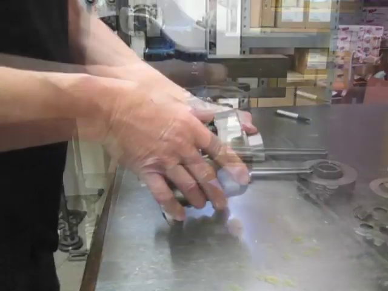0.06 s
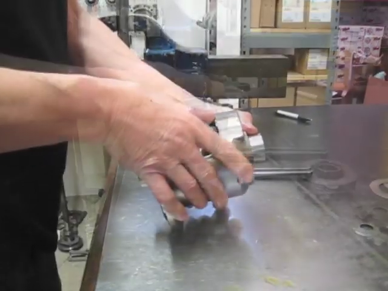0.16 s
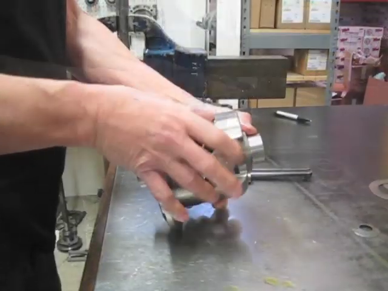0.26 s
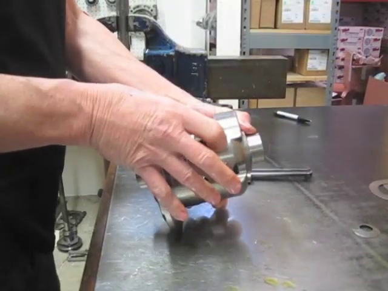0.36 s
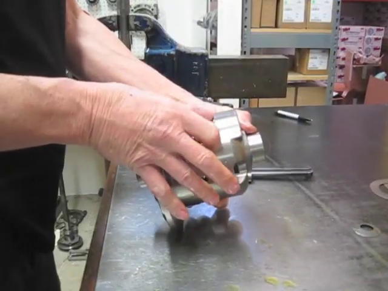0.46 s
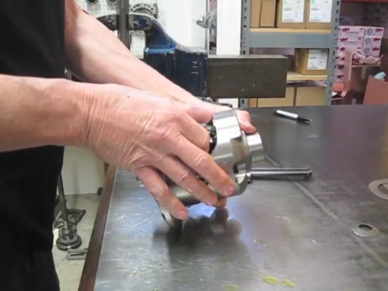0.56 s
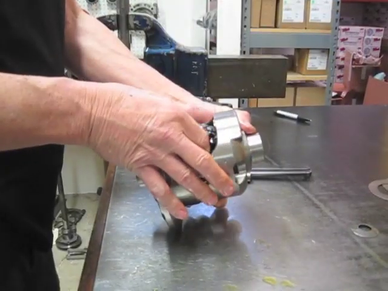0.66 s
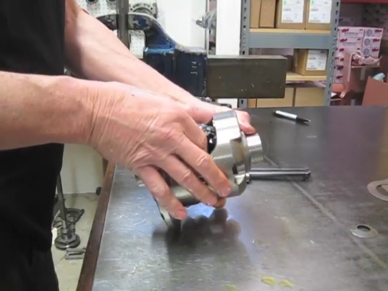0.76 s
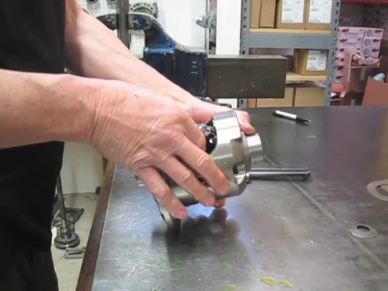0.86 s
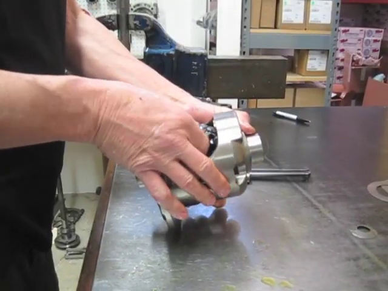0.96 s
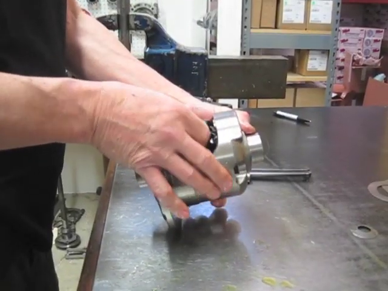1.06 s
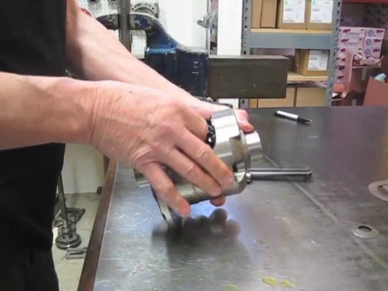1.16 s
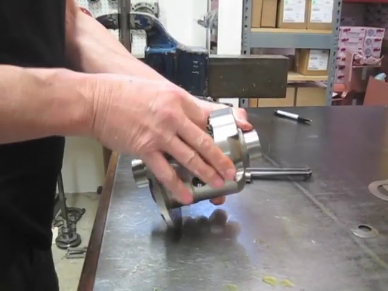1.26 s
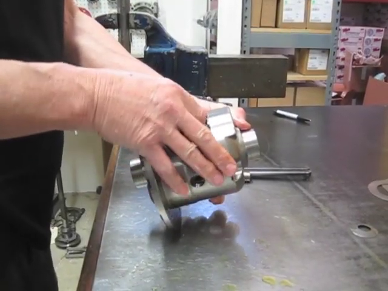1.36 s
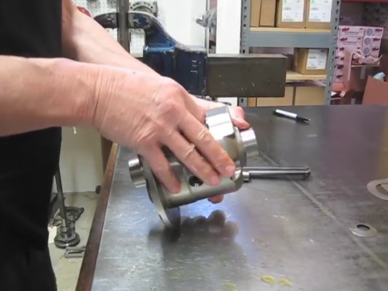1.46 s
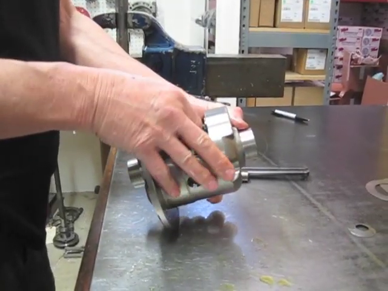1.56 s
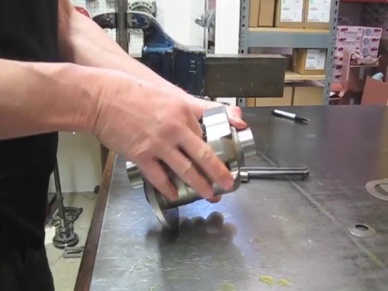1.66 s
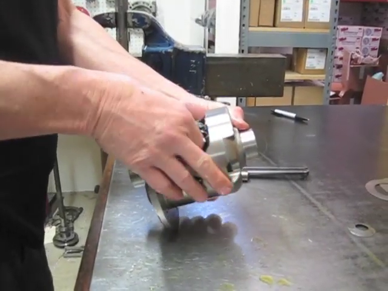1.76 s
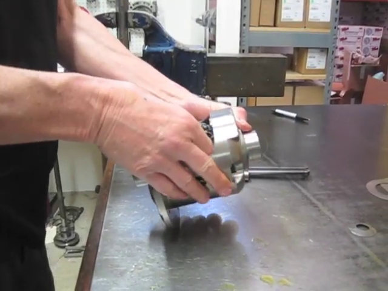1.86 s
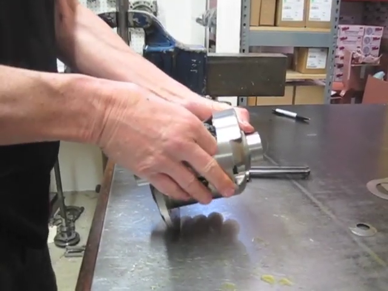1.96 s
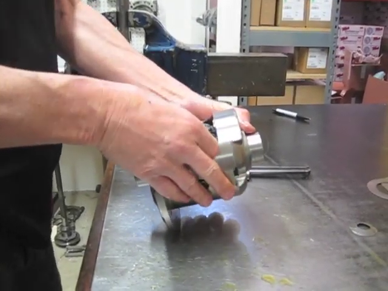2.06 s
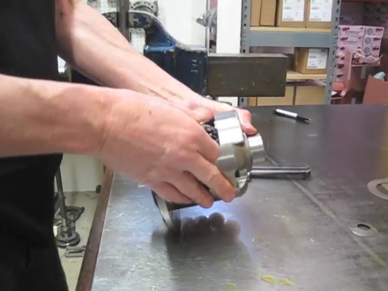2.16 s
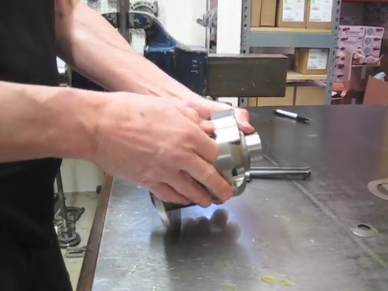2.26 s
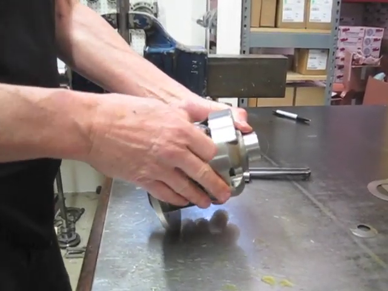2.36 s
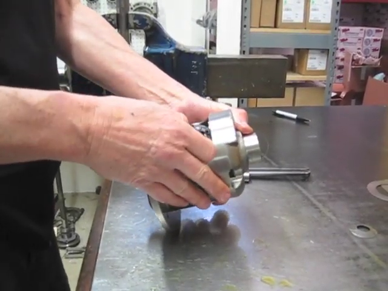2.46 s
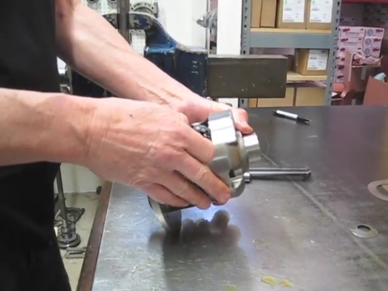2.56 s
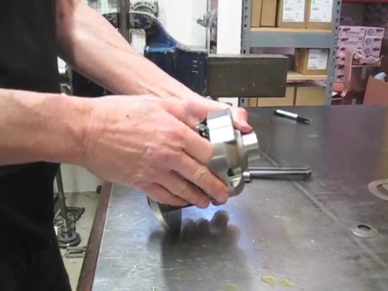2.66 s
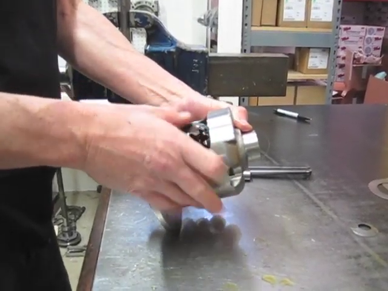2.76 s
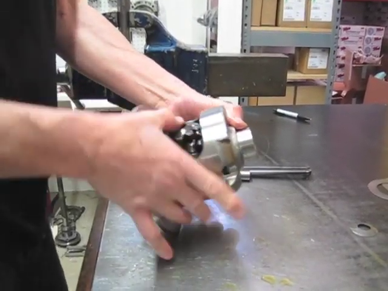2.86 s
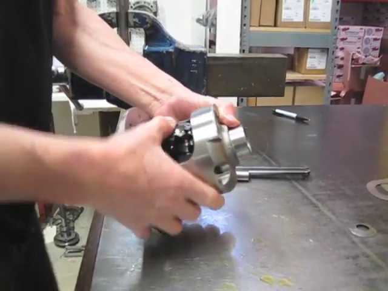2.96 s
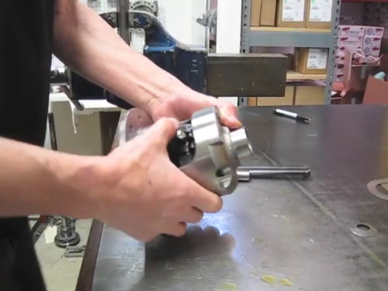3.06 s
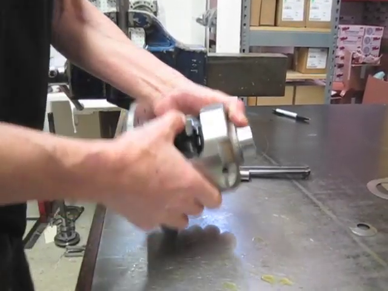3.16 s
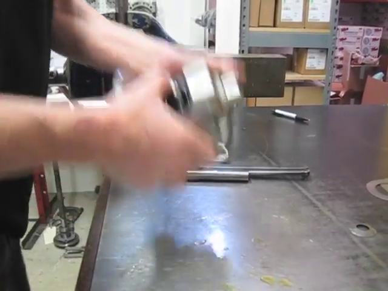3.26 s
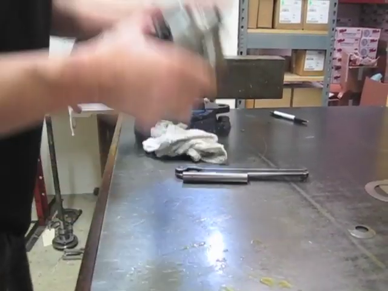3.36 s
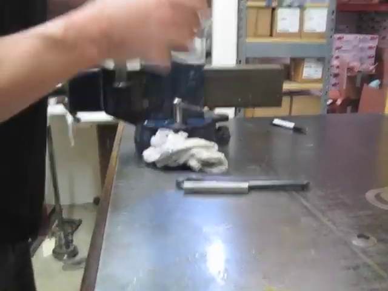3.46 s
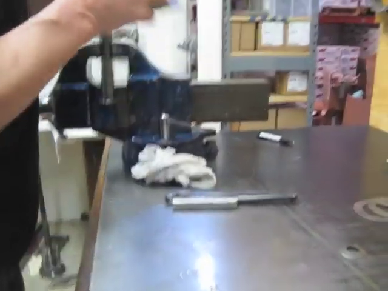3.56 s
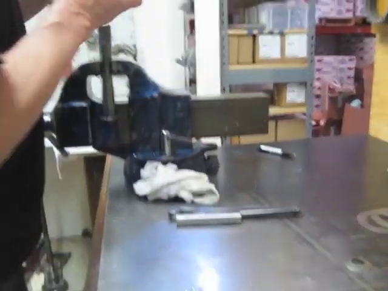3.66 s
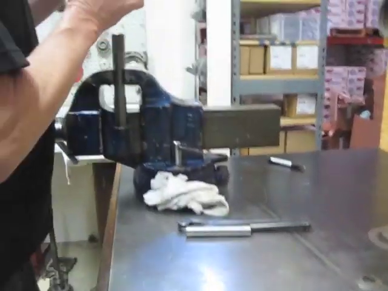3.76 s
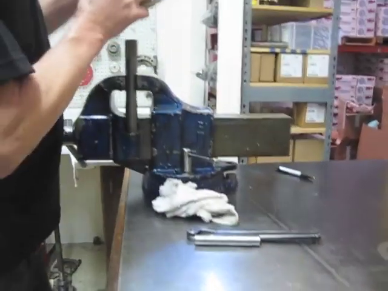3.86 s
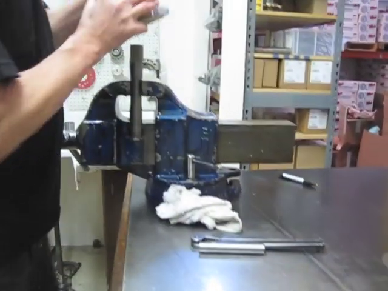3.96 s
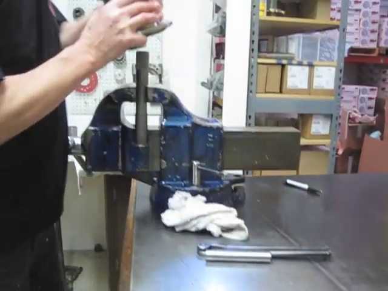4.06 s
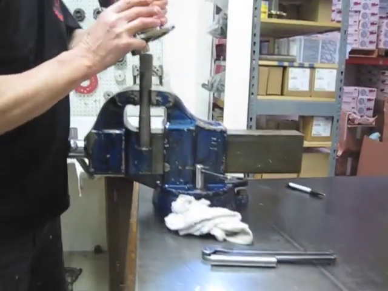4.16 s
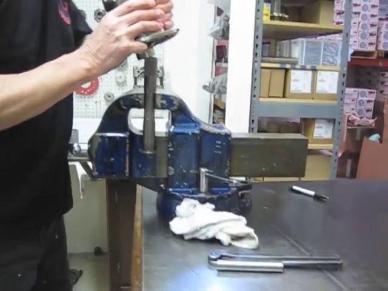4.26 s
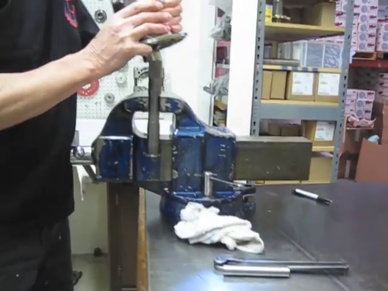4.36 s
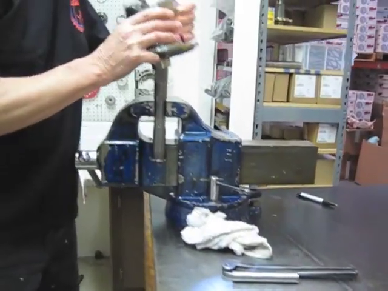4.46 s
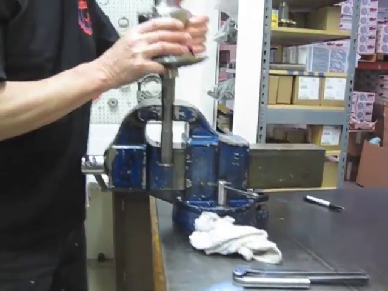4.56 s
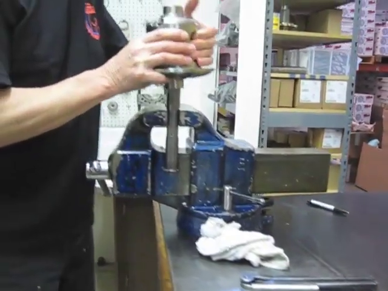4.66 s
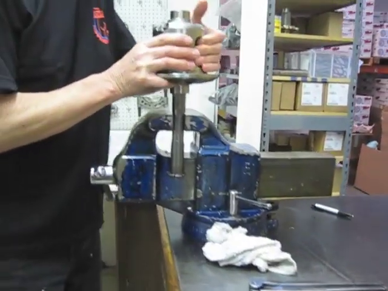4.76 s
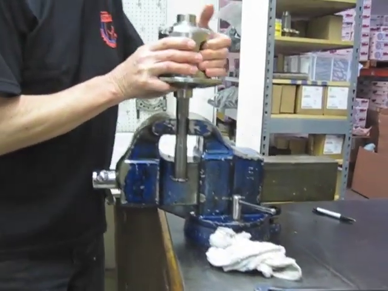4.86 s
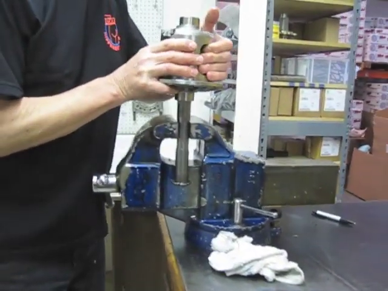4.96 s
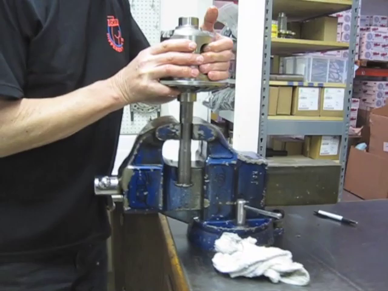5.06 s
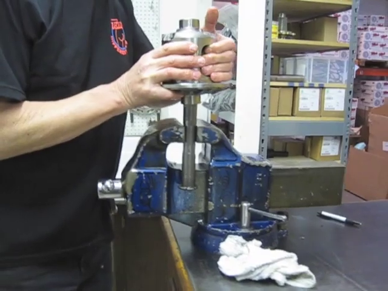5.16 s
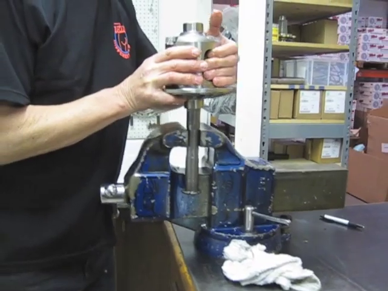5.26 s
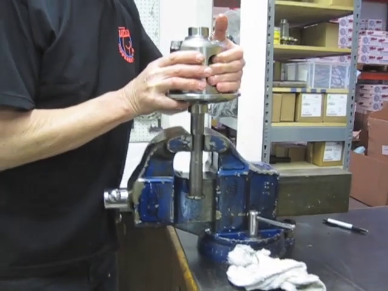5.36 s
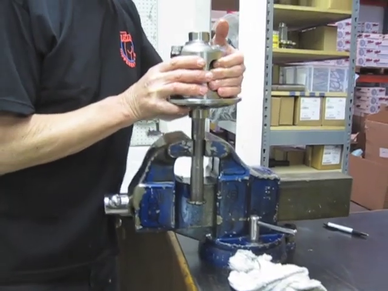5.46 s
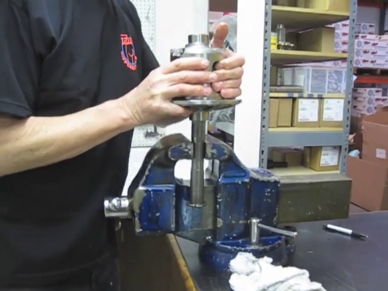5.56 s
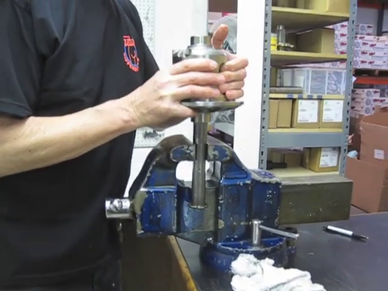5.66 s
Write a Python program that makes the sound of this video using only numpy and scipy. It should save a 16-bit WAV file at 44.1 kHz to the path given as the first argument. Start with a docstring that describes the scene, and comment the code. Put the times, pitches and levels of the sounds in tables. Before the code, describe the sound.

Quiet workshop hum, small metallic rattles and tinks, a pause with soft brushing, then loud steel clunks, a scraping groan and fading soft thuds.

```python
"""Quiet workshop air and lamp hum run throughout, as filtered noise and sines; dry ticks are treble noise bursts.
A mechanic turns a steel gear housing in his hands: its loose gears tink, shiver and clack, ringing its modes.
Brushing slides of skin and cloth are shaped hiss. He lowers the housing onto a shaft held in a bench vice,
which grinds (grains driving modes), clunks and thuds (struck modes) and groans (gliding resonances).
Hard walls answer with band-wise decaying echoes."""
import sys
import numpy as np
from scipy import signal
from scipy.fft import rfft, irfft
from scipy.io import wavfile
from scipy.ndimage import uniform_filter1d

SR = 44100
rng = np.random.default_rng(int(sys.argv[2]) if len(sys.argv) > 2 else 0)


def attenuation_scalar(level_db):
    """Turn a level in dB into a linear amplitude multiplier (20 dB per decade)."""
    decades = np.asarray(level_db, float) / 20
    return 10 ** decades


def materialize(psi):
    """Save the field psi as 16-bit PCM at rate SR to the path in sys.argv[1].

    A 1-D psi becomes a single channel; in a 2-D psi each row is a channel.
    """
    bounded = np.clip(np.atleast_2d(psi).T, -1, 1)
    quanta = np.round(bounded * 32767).astype(np.int16)
    wavfile.write(sys.argv[1], SR, quanta)


N = 251370


def read(points, hz):
    """Spectral interpolation: reads a table on a logarithmic frequency axis."""
    f, value = np.transpose(points)
    return np.interp(np.log(hz + 1), np.log(f + 1), value)


def evened(x):
    """Power normalisation: scales to rms 1."""
    return x / np.sqrt(np.mean(x ** 2) + 1e-20)


def curve(tables):
    """Level envelope: joins (t/s, level/dB) points by straight lines, at -120 dB elsewhere."""
    out = np.full(N, -120.)
    for rows in tables:
        s, value = np.transpose(rows)
        at = np.arange(round(s[0] * SR), min(round(s[-1] * SR), N))
        out[at] = np.interp(at / SR, s, value)
    return out


def stroke(start, rise, fade, db):
    """Amplitude envelope: a parabolic swell and fade in dB, silent outside."""
    edge_db = -25  # level at both ends, relative to the peak
    u = np.arange(N) / SR - start - rise
    u = np.where(u < 0, u / rise, u / fade)
    return attenuation_scalar(db + edge_db * u ** 2) * (abs(u) < 1)


def noise(spectrum, patchy_db):
    """Filtered noise: random short-time spectra with drifting patches, rms 1."""
    a, b, patches = rng.standard_normal((N // 256 + 5, 513, 3)).T
    patches = uniform_filter1d(patches, size=12, axis=0)
    patches = evened(uniform_filter1d(patches, size=12, axis=1))
    shape_db = read(spectrum, np.fft.rfftfreq(1024, 1 / SR))[:, None]
    z = (a + 1j * b) * attenuation_scalar(shape_db + patchy_db * patches)
    return evened(signal.istft(z, nperseg=1024, noverlap=768)[1][:N])


def grains(per_s, spread_db, soft_hz):
    """Shot noise: dense low-passed clicks of random sign, a few of them large, rms 1."""
    size = attenuation_scalar(spread_db * np.minimum(rng.exponential(1, N), 3)) * rng.choice([-1., 1.], N)
    clicks = size * (rng.random(N) < per_s / SR)
    return evened(signal.sosfilt(signal.butter(2, soft_hz, fs=SR, output="sos"), clicks))


def ring(drive, hz, t60):
    """Damped resonator: a unit click excites one mode that falls 60 dB in t60 (at least 5 ms)."""
    r, w = np.exp(-np.log(1000) / (max(t60, .005) * SR)), 2 * np.pi * hz / SR
    return signal.lfilter([0, np.sin(w)], [1, -2 * r * np.cos(w), r * r], drive)


def rubbed(modes, drive, damping):
    """Driven resonance: chatter sustains the modes, damped harder while the parts stay in touch."""
    out = np.zeros(N)
    for hz, db, t60 in modes:
        short_t60 = damping * t60
        out += attenuation_scalar(db) * ring(drive(hz) / np.sqrt(short_t60 * SR), hz, short_t60)
    return out


def struck(modes, crowd, s, colour_db, grip, luck_db, shift, contact_s, bounce_s, bounce_db, size):
    """Modal superposition: each blow shifts and weights the modes and adds a crowd of weak ones."""
    out, t = np.zeros(N + size), np.arange(size) / SR
    hz, db, t60 = np.transpose(modes)[:, :, None]
    bands = [signal.butter(3, [lo, hi], "bandpass", fs=SR, output="sos") for lo, hi, *_ in crowd]
    luck = rng.standard_normal((len(s), 3, len(modes), 1))
    hiss = rng.standard_normal((len(s), len(crowd), size))
    bounces = rng.random((len(s), 4))
    hold = 1 - grip * rng.random(len(s))  # the hands damp each blow differently
    mode_db = np.array([colour_db(f) for f in hz[:, 0]]).T[:, :, None]
    crowd_db = np.array([colour_db(np.sqrt(lo * hi)) + level for lo, hi, level, _ in crowd]).T
    for k, start in enumerate(s):
        fall = -60 * t / hold[k]
        cycles = hz * (1 + shift * luck[k, 0]) * t
        level_db = db + mode_db[k] + luck_db * luck[k, 1] + fall / t60
        rings = attenuation_scalar(level_db) * np.sign(luck[k, 2]) * np.sin(2 * np.pi * cycles)
        sound = (rings * (1 - np.exp(-t * hz / 0.49))).sum(0)  # low modes take longer to build up
        for band, level, white, (low_hz, _, _, crowd_t60) in zip(bands, crowd_db[k], hiss[k], crowd):
            weak = evened(signal.sosfilt(band, white)) * (1 - np.exp(-t * low_hz / 0.51))
            sound += attenuation_scalar(level + fall / crowd_t60) * weak
        taps = signal.unit_impulse(size)  # the loose part rebounds, later rebounds being weaker
        taps[(bounces[k] * bounce_s * SR).astype(int) + 1] = attenuation_scalar(bounce_db - 4.6 * bounces[k])
        sound = signal.fftconvolve(sound * np.clip(t / contact_s, 0, 1), taps)[:size]
        out[round(start * SR):][:size] += sound
    return out[:N]


# spectrum of the workshop air and microphone hiss: f/Hz, relative level/dB
AIR = [(15, -13), (28, 5), (110, -1.5), (230, -2.5), (420, -7.5), (700, -9), (1200, -12.5), (3000, -17),
       (6300, -21.5), (10000, -24), (15800, -34)]
# mains harmonics of the lamps: f/Hz, mean level/dB
HUM = [(120, -69.5), (240, -77.5), (360, -70), (480, -63.5), (600, -77.5), (720, -78.5), (840, -74)]


def air():
    """Broadband noise plus harmonic series: air and microphone hiss under wavering lamp hum."""
    t = np.arange(N) / SR
    out = attenuation_scalar(-54.5) * noise(AIR, patchy_db=-0.2)
    for hz, db in HUM:
        waver = evened(uniform_filter1d(rng.standard_normal(N), size=4000, mode="wrap"))
        out += np.sqrt(2) * attenuation_scalar(db + 1.5 * waver) * np.sin(2 * np.pi * (hz * t + rng.random()))
    return out


# dry ticks of skin and grit on steel: t/s, level before the envelope/dB, spectrum at 12.5 kHz/dB
TICKS = [(0.135, -68, -20), (0.236, -51.5, 18), (0.248, -64, 20), (1.0168, -40, -4), (1.7834, -45, 6),
         (1.855, -50, -7), (1.925, -50, -21), (2, -54, -20), (2.1083, -57, -5), (2.145, -53, 7),
         (2.22, -55, 6), (2.232, -54, -3), (2.724, -53, 4), (2.742, -46.5, 7), (2.752, -58, -3),
         (2.804, -44, 7), (2.819, -52, 8), (2.8469, -53, 8), (2.941, -51.5, -3), (2.983, -51, 0),
         (2.9994, -56, -5), (3.13, -57, -15), (3.158, -51, 7), (3.1747, -30.5, -32), (3.2986, -50, -6),
         (3.3584, -37, -4), (3.638, -49, -11), (3.6658, -42.5, -4), (4.2428, -39, -8), (4.464, -41, -23),
         (4.473, -31, -30), (4.6875, -39, -30), (4.821, -44, -18), (4.924, -51, -23), (5.6103, -40.5, 3)]


def ticks():
    """Impulsive noise: short bunches of treble crackle under a rounded envelope."""
    decay_s, lead_s = 0.0023, 0.0015  # the envelope peaks after two decay times
    out, t = np.zeros(N + 4096), np.arange(4096) / SR
    hz = np.fft.rfftfreq(4096, 1 / SR)
    u = t / decay_s
    draws = rng.standard_normal((len(TICKS), 2, 4096))
    for (s, db, top_db), (puff, lumps) in zip(TICKS, draws):
        spectrum = [(2500, 1.5), (5500, 1.0), (8000, -2.0), (12500, top_db), (16000, top_db - 15)]
        hiss = evened(irfft(rfft(puff) * attenuation_scalar(read(spectrum, hz))))
        crackle = attenuation_scalar(3.5 * evened(uniform_filter1d(lumps, size=40)))
        out[round((s - lead_s) * SR):][:4096] += attenuation_scalar(db) * hiss * crackle * u ** 2 * np.exp(-u)
    return out[:N]


# small parts touching: t/s, level/dB, f/Hz, t60/s (held to 25 ms at most)
TINKS = [(0.805, -50, 4170, .025), (0.8987, -38.5, 5530, 0.0046), (1.017, -30, 6860, .013),
         (1.266, -23, 2400, 0.0054), (1.514, -35, 4900, 0.0094), (1.67, -36, 4670, 0.014),
         (1.818, -38.5, 3780, 0.015), (1.861, -50, 6100, .018), (1.878, -48, 4250, .02),
         (1.9155, -50, 3260, .017), (3.653, -33, 2600, 0.0043), (4.479, -20.5, 3910, 0.018),
         (4.483, -34, 6000, 0.027), (4.8181, -22.5, 3050, .014)]


def tinks():
    """Two-mode free vibration: each light contact excites a close pair of decaying tones."""
    pair_ratio = 1.09
    out, t = np.zeros(N), np.arange(2048) / SR
    for s, db, hz, t60 in TINKS:
        pair = np.sin(2 * np.pi * hz * t) + .5 * np.sin(2 * np.pi * pair_ratio * hz * t)
        decay = attenuation_scalar(db - 60 * t / min(t60, .025))
        out[round(s * SR):][:2048] += decay * pair * (1 - np.exp(-t * hz / 2))
    return out


# gears shivering between the knocks: start t/s, length/s, first level/dB, change over the length/dB
SHIVER = [(0.998, 0.17, -65, 3.5), (1.254, 0.094, -64, -16), (1.506, .25, -70.5, 0)]
# modes of the steel housing: f/Hz, level/dB, undamped t60/s
HOUSING = [(410, -4.5, 0.085), (487, -14, 0.057), (740, 2.5, 0.0049), (873, 3.5, 0.044), (1140, 4, 0.019),
           (1400, -23, 0.053), (1530, -3.5, 0.035), (1967, -2.5, 0.047), (2205, -6, 0.035),
           (2446, 4.5, 0.015), (2760, -13, 0.02), (2880, -2.5, 0.024), (3775, -20, 0.028),
           (4170, -12, 0.036), (4560, 2, 0.044), (5250, 5, 0.041), (6000, -19, .06), (6300, -1, 0.048),
           (7800, -17, 0.024)]


def shiver():
    """Resonant response to shot noise: light gear chatter drives the housing modes."""
    level = curve([[(s, db), (s + length, db + change)] for s, length, db, change in SHIVER])
    chatter = attenuation_scalar(level) * grains(1500, spread_db=3.0, soft_hz=1950)
    return chatter + rubbed(HOUSING, lambda hz: chatter, damping=0.25)


# loose gears knocking the hand-held housing: t/s, blow level/dB, upper modes' relative level/dB
CLACKS = [(1.015, -44, 3), (1.026, -40, -5), (1.032, -44, 1), (1.039, -36.5, 4.5), (1.049, -37, 5),
          (1.058, -39.5, 3), (1.066, -50, -14), (1.082, -45, -19), (1.096, -53, -9), (1.104, -44, -20),
          (1.129, -51, -10), (1.137, -43, -12), (1.2676, -33.5, 5), (1.271, -51, -20), (1.295, -56, -7),
          (1.514, -38, 6), (1.524, -35.5, -19), (1.533, -50, -24), (1.547, -43.5, -19), (1.559, -44, -23),
          (1.642, -43.5, -13), (1.662, -40, -8), (1.671, -33, -3), (1.694, -40.5, -4), (1.703, -41, -19)]
# crowd of weak housing modes: low f/Hz, high f/Hz, level/dB, undamped t60/s
HOUSING_CROWD = [(300, 460, -15, 0.079), (640, 1470, -0.5, 0.056), (1430, 2650, -6.5, 0.027),
                 (3300, 9700, -8, .025)]


def clacks():
    """Impact excitation: gears knock the housing, whose ringing the hands damp."""
    s, db, upper_db = np.transpose(CLACKS)

    def colour(hz):
        if hz < 1400:
            return db
        if hz < 3800:
            return db + upper_db
        return db - 25.5 + 0.61 * upper_db  # top modes brighten with the upper ones, less steeply

    return struck(HOUSING, HOUSING_CROWD, s, colour, grip=0.54, luck_db=4, shift=0.044,
                  contact_s=0.00026, bounce_s=.014, bounce_db=-12, size=4096)


# soft brushing slides: start t/s, rise/s, fade/s, level/dB, gain above 5 kHz/dB
SLIDES = [(1.65, 0.25, 0.24, -58.5, -3), (2.6, 0.39, .5, -67, 5), (3.1, 0.23, 0.21, -52, -7),
          (3.82, 0.047, 0.11, -57, -3), (3.85, 0.23, .4, -56.5, -3), (4.205, 0.015, 0.022, -52, -16),
          (4.202, 0.12, 0.16, -33, -8.5), (5.2, .17, 0.29, -60, -1.5), (5.3, 0.36, .4, -62.5, 8)]
# spectrum of the brushing: f/Hz, relative level/dB
SLIDE = [(500, -45), (1000, -5.5), (1500, -3.5), (2000, -1), (3600, 0), (4800, -6), (6000, -6.5),
         (12000, -15), (15800, -28)]


def slides():
    """Friction noise: brushing hiss swells and fades, its treble set stroke by stroke."""
    hiss = noise(SLIDE, patchy_db=1.5)
    body = signal.filtfilt(*signal.butter(2, 5000, fs=SR), hiss)
    out = np.zeros(N)
    for start, rise, fade, db, bright_db in SLIDES:
        out += (body + attenuation_scalar(bright_db) * (hiss - body)) * stroke(start, rise, fade, db)
    return out


# splines grinding along the shaft, two passages: t/s, pressure level/dB
GRIND = [
    [(3.12, -68), (3.212, -51), (3.3, -73)],
    [(4.42, -65), (4.508, -34), (4.622, -36), (4.692, -36.5), (4.88, -46.5), (4.98, -56), (5.566, -55),
     (5.7, -47)],
]
# modes of shaft, vice and bench top: f/Hz, level/dB, undamped t60/s
BENCH = [(51.8, -6, 0.19), (107.3, 0.5, 0.063), (136.8, 1.5, 0.048), (211, -6, 0.091), (236.3, 4.5, 0.05),
         (293.4, -3.5, 0.062), (349, -11, 0.12), (412, -5, 0.17), (450, -19, 0.36), (532, -19, 0.37),
         (572, -18, 0.26), (690, -4.5, 0.034), (727.7, -13.5, 0.2), (906.4, -11, 0.13), (956.5, -5, 0.13),
         (1232, -7, 0.25), (1611, 4, 0.047), (1817, -4, 0.18), (1852, 10, 0.016), (2095, 1, 0.034),
         (2183, -10, 0.23), (2330, -1, 0.033), (2613, 5, 0.036), (3340, -7, 0.089), (3450, -8, 0.05),
         (3807, -15, 0.17), (5930, -6.5, 0.044), (6080, 3, 0.05), (6800, -23, 0.037), (8100, -4, 0.079)]


def grind():
    """Friction-driven resonance: coarse and fine grains excite shaft, vice and bench top."""
    bass_db, upper_db, shrill_per_db = -13, -12, -0.09  # hard pressure dulls the upper modes
    level = uniform_filter1d(curve(GRIND), size=300)
    coarse = grains(1500, spread_db=4.5, soft_hz=950)
    fine = grains(4000, spread_db=13.0, soft_hz=3050)
    mid = coarse * attenuation_scalar(level)
    low = mid * attenuation_scalar(bass_db)
    high = fine * attenuation_scalar(level + upper_db + shrill_per_db * (level + 48))

    def drive(hz):
        if hz < 300:
            return low
        if hz < 1100:
            return mid
        return high * attenuation_scalar(-7 * np.log2(hz / 1400))  # falls 7 dB per octave

    return rubbed(BENCH, drive, damping=0.31)


# blows on shaft, vice and bench: t/s, blow level/dB, bass relative level/dB, upper relative level/dB
CLUNKS = [(3.14, -59, 18, -20), (3.162, -53, 18.5, -22), (3.175, -36, -19, -14), (3.188, -44, -14, -10),
          (3.212, -55, -4, -3), (3.653, -51.5, -4, -5), (3.926, -54, 14, -21), (3.936, -45, 4, -17),
          (4.211, -39.5, -1, -7), (4.245, -14, -5.5, -25), (4.255, -20.5, -20, -18.5),
          (4.264, -32.5, 6.5, -5), (4.443, -30, -10.5, -8), (4.445, -16, -0.5, -25), (4.465, -24.5, -4, -8),
          (4.47, -12, -9, -19.5), (4.481, -23, -11, -7.5), (4.63, -24.5, 5.5, -16.5),
          (4.649, -32.5, -23, -19), (4.692, -39.5, -12, 12.5), (4.697, -16, -10, -24),
          (4.707, -30, -22, -19), (4.714, -23, 4.5, -21), (4.727, -17, -6.5, -11.5),
          (4.735, -15.5, -10, -21), (4.759, -33, 2.5, -26), (4.784, -31, 5.5, -11.5),
          (4.82, -26, -22, -16.5), (4.85, -35, 9, -16), (4.96, -39, 8, -17.5), (5.174, -35.5, 8, -21.5),
          (5.199, -55, -9, -24), (5.277, -41.5, 8.5, -18), (5.289, -51, 0, -16), (5.304, -49.5, 12, -16),
          (5.374, -55, 13, -2), (5.526, -42.5, 11, -18), (5.549, -48.5, 18.5, -32.5),
          (5.579, -33.5, 5.5, -17.5), (5.6, -49.5, -12, -3), (5.634, -48, 4.5, -12), (5.657, -42, 15, -8),
          (5.68, -47.5, 15, -18)]
# crowd of weak bench modes: low f/Hz, high f/Hz, level/dB, undamped t60/s
BENCH_CROWD = [(60, 420, 3, 0.1), (300, 1065, -4, 0.059), (1130, 3150, -6, 0.21), (2600, 4200, -20, 0.043),
               (4600, 11000, -5.5, 0.045)]


def clunks():
    """Impact excitation: blows ring shaft, vice and bench, and harder ones add more deep bass."""
    seated_s, seated_db, top_db = 4.6, -11, -14
    s, db, bass_db, upper_db = np.transpose(CLUNKS)
    deep_db = bass_db + 0.16 * (db + 33.0)  # heavy blows shake the whole bench

    def colour(hz):
        if hz < 125:
            tilt = deep_db
        elif hz < 300:
            tilt = bass_db
        elif hz < 1100:
            tilt = 0
        elif hz < 4500:
            tilt = upper_db
        else:
            tilt = upper_db + top_db
        # once seated, the hands damp all above 2.5 kHz
        return db + tilt + seated_db * (s > seated_s) * (hz > 2500)

    return struck(BENCH, BENCH_CROWD, s, colour, grip=0.67, luck_db=3.0, shift=.022,
                  contact_s=0.00086, bounce_s=.03, bounce_db=-8.0, size=11000)


# narrow rubbing tones: a swish, a groan rising as the free shaft shortens, the bench top humming on:
# start t/s, rise/s, fade/s, level/dB, first f/Hz, last f/Hz, bandwidth/Hz, steady share (0-1)
GROAN = [(3.24, 0.068, 0.11, -56.5, 2714, 2890, 280, .05), (4.5, .13, .12, -26, 447, 950, 105, 0.23),
         (4.76, 0.074, .08, -28.5, 232, 213.8, 31, 0.58), (4.9, 0.047, 0.34, -42, 211, 205, 26, 0.8)]


def groan():
    """Gliding resonance: a steady tone and narrow-band noise share one moving frequency."""
    out = np.zeros(N)
    for start, rise, fade, db, first_hz, last_hz, width_hz, steady in GROAN:
        # free length, and so the period, changes steadily
        ends = [start, start + rise + fade]
        hz = 1 / np.interp(np.arange(N) / SR, ends, [1 / first_hz, 1 / last_hz])
        turn, r = np.exp(2j * np.pi * np.cumsum(hz) / SR), np.exp(-np.pi * width_hz / SR)
        white = rng.standard_normal(N) + 1j * rng.standard_normal(N)
        slow = signal.lfilter([1 - r], [1, -r], white)
        slow = signal.lfilter([1 - r], [1, -r], slow)
        fuzzy = evened((turn * slow).real)
        tone = np.sqrt(2) * turn.real
        out += (steady * tone + (1 - steady) * fuzzy) * stroke(start, rise, fade, db)
    return out


# reverberation of the hard-walled workshop: f/Hz, t60/s
ROOM = [(100, 0.73), (500, 0.35), (2000, 0.17), (5000, 0.36), (10000, 0.24)]


def room(x):
    """Reverberation: echoes of random sign, one per 22 samples, each band decaying at its own rate."""
    taps = np.zeros(SR // 2)
    at = np.arange(200, SR // 2 - 22, 22)
    taps[at + rng.integers(0, 22, len(at))] = rng.choice([-1., 1.], len(at))
    hz, t, z = signal.stft(taps, SR, nperseg=256)
    tail = signal.istft(z * attenuation_scalar(-60 * t / read(ROOM, hz)[:, None]), SR, nperseg=256)[1]
    return signal.fftconvolve(x, tail / np.linalg.norm(tail))[:N]


def scene():
    """Linear superposition: work sounds and their reverberation add to the air."""
    work = ticks() + tinks() + shiver() + clacks() + slides() + grind() + clunks() + groan()
    return (work + attenuation_scalar(-9) * room(work) + air())[None]


def top_cut(x):
    """Nothing passes above the cut-off."""
    return signal.sosfilt(signal.butter(12, 16460, fs=SR, output="sos"), x)


def record(dry):
    """High-pass response: a small microphone loses the deepest bass."""
    heard = signal.sosfilt(signal.butter(2, 33, "highpass", fs=SR, output="sos"), dry)
    return top_cut(heard)


dry = scene()
out = record(dry)
materialize(out)
```